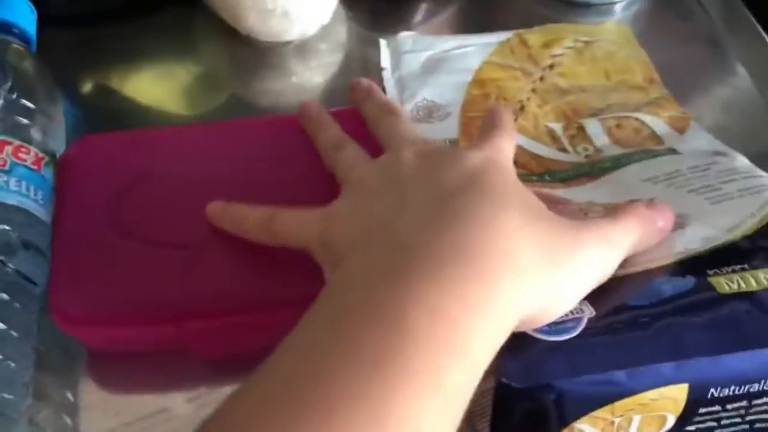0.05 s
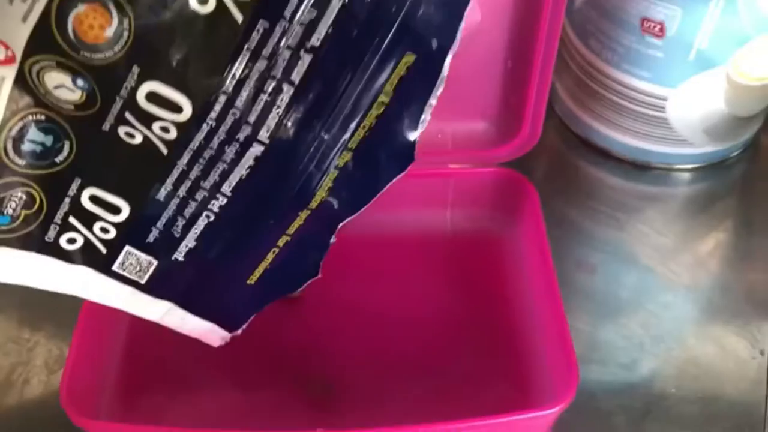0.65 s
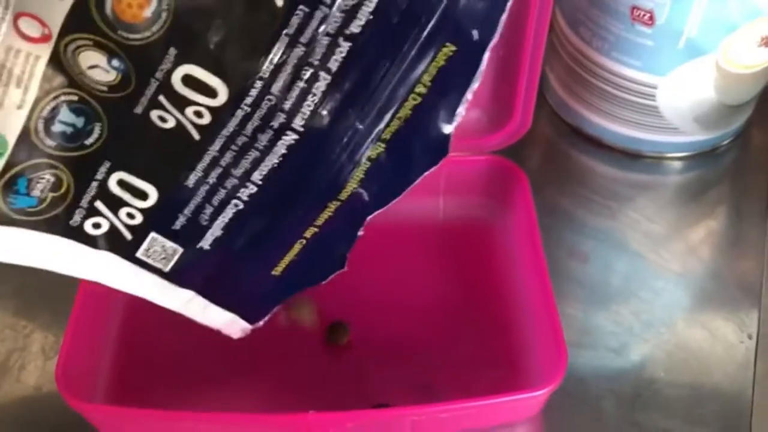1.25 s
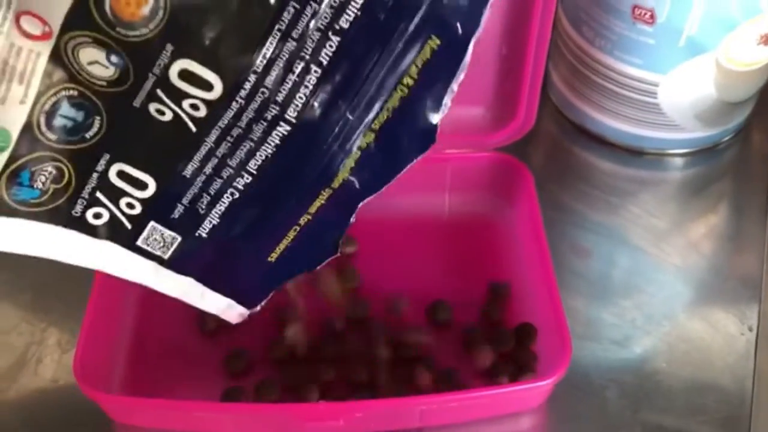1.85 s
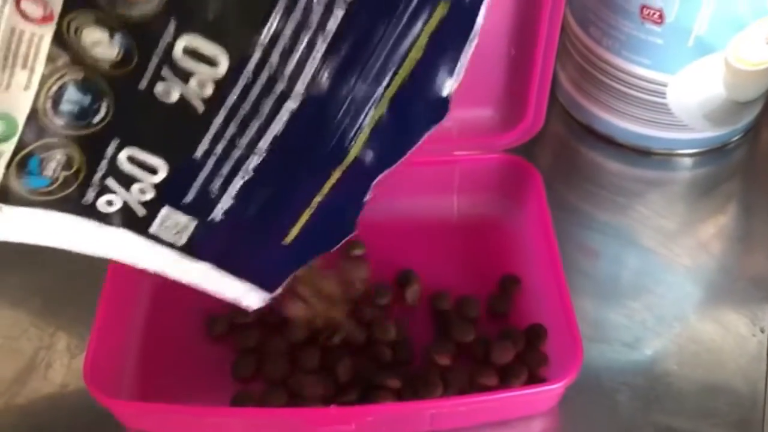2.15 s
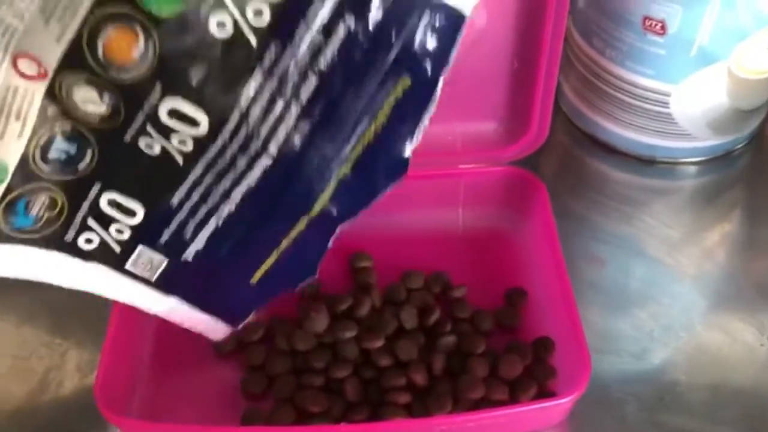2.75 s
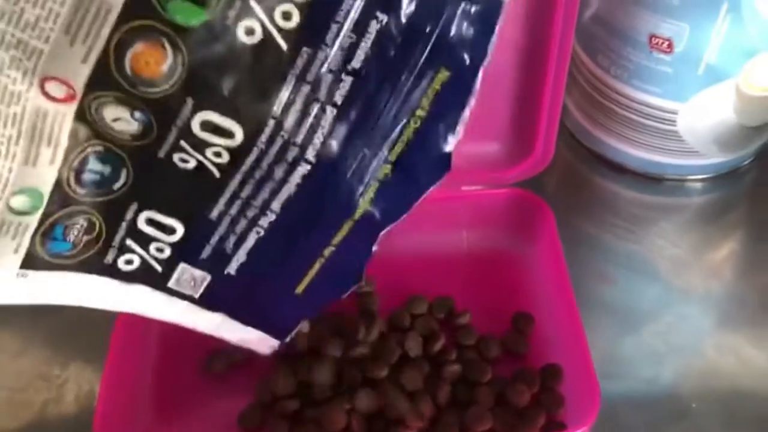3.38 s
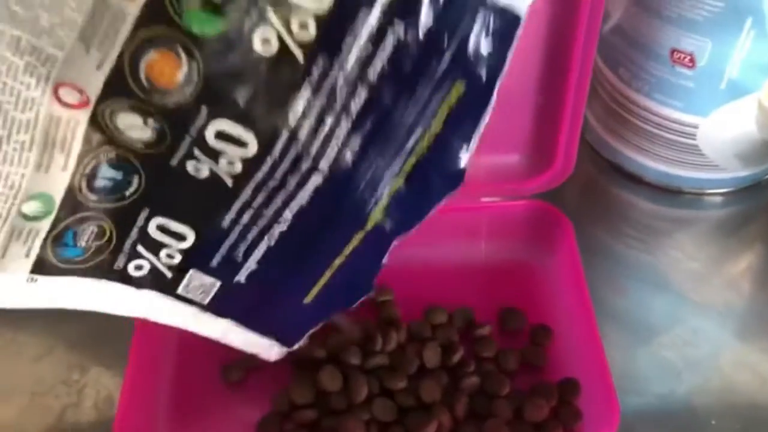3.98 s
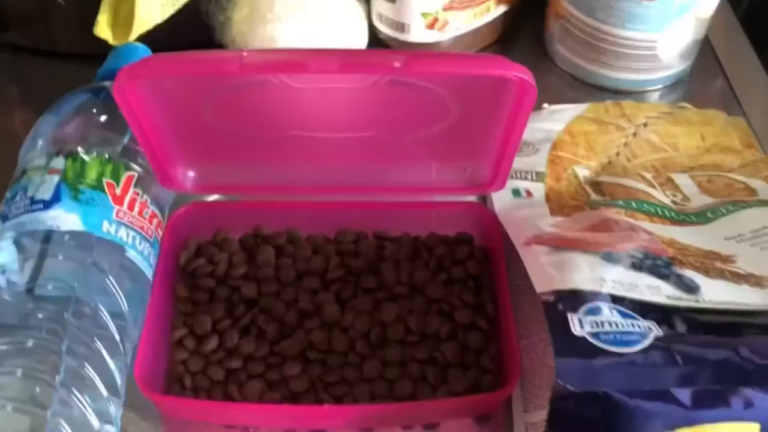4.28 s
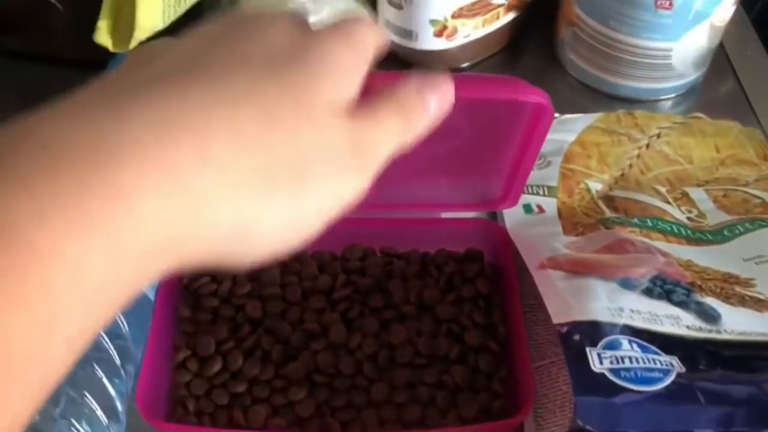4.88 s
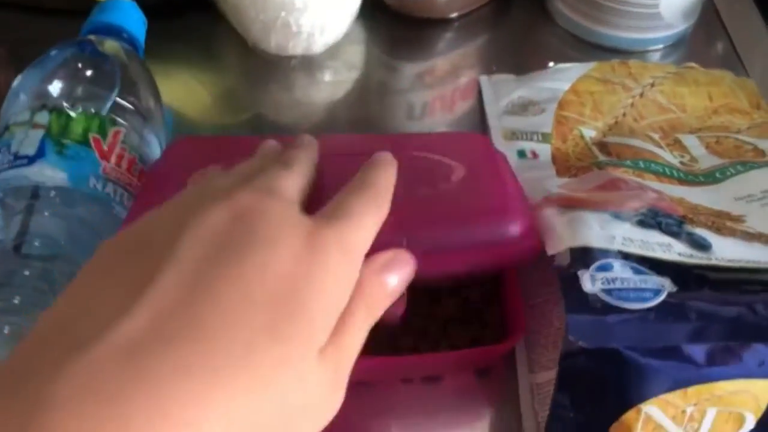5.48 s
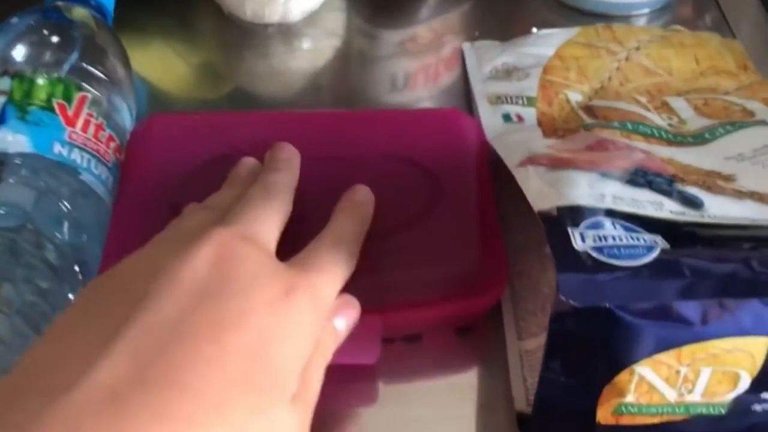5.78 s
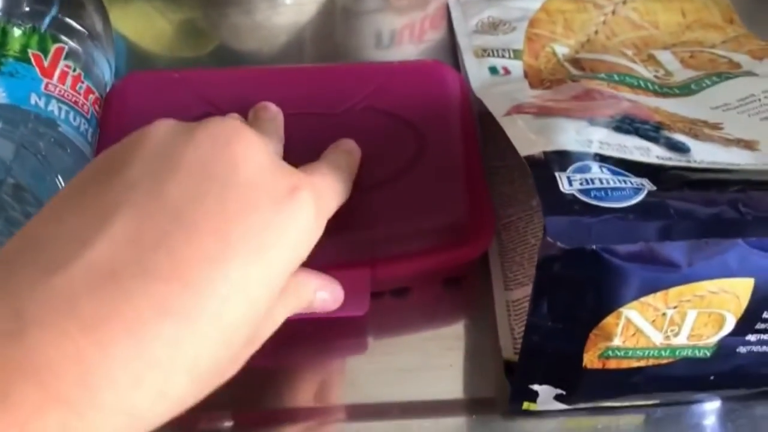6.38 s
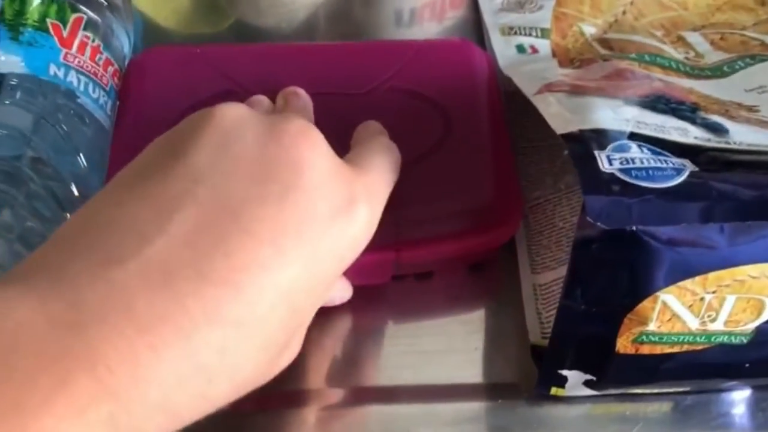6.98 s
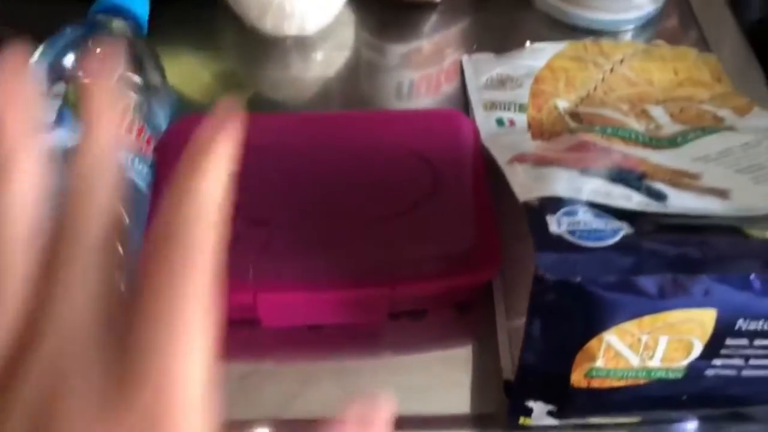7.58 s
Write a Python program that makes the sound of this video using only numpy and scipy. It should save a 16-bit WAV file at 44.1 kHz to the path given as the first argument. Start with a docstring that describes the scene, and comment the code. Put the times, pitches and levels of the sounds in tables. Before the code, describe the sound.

Dry pet food pours from a crinkling foil bag into a plastic box, then the lid is pressed down and snaps shut.

```python
"""A small kitchen, close up. A plastic box sticks, slips and knocks over a steel counter.
Dry kibble tumbles in a crinkling foil bag and pours into the box, each pellet a crack that rings
the thin floor. The last pieces are shaken out; the lid is folded down and snaps shut.
Soft hiss and an appliance drone lie underneath. The sound drops out briefly twice."""
import sys
import numpy as np
from scipy import signal
from scipy.fft import rfft, irfft
from scipy.io import wavfile
from scipy.ndimage import uniform_filter1d

SR = 44100
rng = np.random.default_rng(int(sys.argv[2]) if len(sys.argv) > 2 else 0)


def waveform_to_disk(signal):
    """Save audio, clipped to [-1, 1], as 16-bit WAV at the path in sys.argv[1]."""
    frames = np.transpose(np.atleast_2d(signal))
    scaled = np.clip(frames, -1, 1) * 32767
    samples = np.round(scaled).astype(np.int16)
    wavfile.write(sys.argv[1], SR, samples)


N = 341334
TIME_S = np.arange(N) / SR
GRAIN_S = np.arange(4096) / SR
HZ = np.fft.rfftfreq(len(GRAIN_S), 1 / SR)

# plastic box modes: pitch_hz, level_db, t60_s
BOX_MODES = [(315, -12, 0.049), (370, -12, 0.02), (470, -5.5, 0.06), (634, -5, 0.013), (720, -3.5, .045),
             (850, -1, 0.019), (992, 3, 0.052), (980, -5, .03), (1165, -3, .035), (1356, -7.5, .05),
             (1500, -5.5, .03), (1770, -4, 0.11), (2310, -10.5, .03)]
# steel counter modes: pitch_hz, level_db, t60_s
COUNTER_MODES = [(72, -11, 0.075), (107, -6, 0.059), (134, -3.5, 0.17), (161, -0.5, 0.1),
                 (191.8, -2.5, 0.097), (232, -7, 0.062), (286, -5.5, 0.035), (370, -0.5, 0.078)]
# friction hiss: freq_hz, level_db
FRICTION_SPECTRUM = [(900, -17), (1800, -7), (3000, -4), (4300, -6), (6000, -7), (8500, -12.5),
                     (11500, -17), (13000, -50)]


def gain_of(db):
    """Decibels to amplitude."""
    return 10 ** (np.asarray(db) / 20)


def unit(x):
    """Scales to energy 1."""
    return x / (np.linalg.norm(x) + 1e-12)


def curve_at(points, hz):
    """Interpolates on a log-frequency axis."""
    freq_hz, value = np.transpose(points)
    return np.interp(np.log(hz + 1), np.log(freq_hz + 1), value)


def fade(t, t60_s):
    """Exponential decay."""
    return np.exp(-np.log(1000) * t / np.maximum(t60_s, 1e-4))


def swell(start_s, length_s, level_db, rise_s, fall_s):
    """Rises to start_s, holds, falls; about 60 dB per rise_s and fall_s."""
    spans_away = np.maximum((start_s - TIME_S) / rise_s, (TIME_S - start_s - length_s) / fall_s)
    return gain_of(level_db) * fade(np.clip(spans_away, 0, 2), 0.98)


def add(mix, start_s, sound):
    """Mixes a sound in at start_s."""
    part = mix[max(round(start_s * SR), 0):][:len(sound)]
    part += sound[:len(part)]


def click(spectrum_db):
    """Minimum-phase pulse with this spectrum."""
    log_gain = np.log(gain_of(np.maximum(spectrum_db - spectrum_db.max(), -100)))
    mirrored = np.r_[log_gain, log_gain[-2:0:-1]]
    log_response = np.conj(signal.hilbert(mirrored))[:len(HZ)]
    return unit(irfft(np.exp(log_response)))


def coloured(x, spectrum_db):
    """Causal filter with this spectrum."""
    return signal.oaconvolve(x, click(spectrum_db))[:len(x)]


def wash(spectrum):
    """Smooth coloured noise, rms 1."""
    noise = coloured(rng.standard_normal(N), curve_at(spectrum, HZ))
    return noise / np.sqrt(np.mean(noise ** 2) + 1e-20)


def crack(spectrum_db, t60_s):
    """Hard contact: countless tiny, short-lived modes, as a noise burst."""
    burst = rng.choice([-1., 1.], len(GRAIN_S)) * fade(GRAIN_S, t60_s)
    return unit(coloured(burst, spectrum_db))


def ring(modes, spread_db, detune):
    """Modes struck at a random spot, which weights and detunes them."""
    pitch_hz, level_db, t60_s = np.transpose(modes)[:, :, None]
    weight, shift, sign = rng.uniform(-1, 1, (3, len(pitch_hz), 1))
    cycles = pitch_hz * (1 + detune * shift) * GRAIN_S
    waves = np.sin(2 * np.pi * cycles) * fade(GRAIN_S, t60_s) * (1 - np.exp(-2 * cycles))
    return unit((np.sign(sign) * gain_of(level_db + spread_db * weight) * waves).sum(0))


def patter(grains, per_s, spread_db):
    """Random shower of grains, many small and a few large, at a steady mean level."""
    chance = rng.random(N)
    sizes = gain_of(spread_db * np.minimum(rng.exponential(1, N), 3))
    kind = rng.integers(0, len(grains), N)
    shower = np.zeros(N)
    for i in np.flatnonzero(chance < per_s / SR):
        add(shower, i / SR, sizes[i] * grains[kind[i]])
    local_power = abs(uniform_filter1d(shower ** 2, size=3000))
    return shower / np.sqrt(local_power + 0.011 * np.mean(shower ** 2))


def pour(flow):
    """Pellets of many sizes rain on the box and each other, denser as the flow grows."""
    # pellet impact: freq_hz, level_db
    spectrum = [(820, -42.5), (1400, -10), (2300, -4.5), (2650, 7), (4270, 4), (9160, -12.5),
                (11200, -10.5), (12000, -33.5), (15600, -62), (22000, -120)]
    sizes = np.exp(0.16 * rng.standard_normal(90))
    grains = [pellet(curve_at(spectrum, HZ * size), t60_s=.011) for size in sizes]
    return flow * patter(grains, per_s=160 + 520 * flow / flow.max(), spread_db=3.5)


def pellet(spectrum_db, t60_s):
    """One pellet lands: a dry crack and a faint ring of the box floor."""
    # thin box floor: pitch_hz, level_db, t60_s
    floor_modes = [(2000, -11, 0.12), (2080, 5.5, 0.058), (2630, 12.5, 0.049), (2780, 1, 0.18),
                   (2950, -4.5, .06), (3070, -9.5, 0.036), (3500, 2, 0.04), (3700, -1.5, 0.039),
                   (3960, -6.5, 0.029), (4280, -3, 0.019), (5150, -4, 0.0093), (6150, -6.5, 0.011)]
    strike = unit(0.24 * click(spectrum_db) + crack(spectrum_db, t60_s))
    return strike + gain_of(-9) * ring(floor_modes, spread_db=7.5, detune=0.01)


def outflow(motion):
    """Envelope of the stream from the bag: a trickle while the kibble slides, plus gushes."""
    # gushes at the bag mouth: start_s, length_s, level_db
    gushes = [(1.435, 0.13, -28.5), (1.746, 0.036, -30), (1.848, .09, -27), (2.03, .05, -29.5),
              (2.295, 0.051, -33), (2.407, 0.013, -39.5), (3.349, 0.025, -42)]
    surges = [swell(*gush, rise_s=0.68, fall_s=0.64) for gush in gushes]
    trickle = gain_of(-16) * motion
    return np.linalg.norm([trickle] + surges, axis=0)


def ticks():
    """Single pellet strikes and snapping creases, each with a hollow thud of the box."""
    # strikes: start_s, level_db, brightness_hz, thud_db
    strikes = [(.6588, -3.5, 2870, -32), (.7341, -17.5, 3270, -29.5), (0.8618, -29.5, 2400, -49.5),
               (.9411, -4, 2800, -24), (1.0021, -5.5, 4000, -30), (1.0565, -20, 3700, -40),
               (1.0714, -30, 1700, -24.5), (1.2733, -2, 2970, -37.5), (1.3249, -13.5, 4180, -38.5),
               (1.3423, -12, 2750, -39), (1.3565, -7, 4470, -42.5), (1.3868, -1, 4700, -25),
               (1.4018, -3, 3260, -39.5), (1.4445, -5, 3710, -34.5), (1.4619, -8.5, 4170, -30),
               (1.481, -10.5, 4120, -26.5), (1.496, 1.5, 2860, -20), (1.54, -6.5, 4430, -28),
               (1.5494, -8.5, 2720, -40), (1.558, -6, 2640, -39), (1.5999, 1, 4540, -23),
               (1.745, -11, 4400, -22.5), (1.8195, -4.5, 3720, -38.5), (1.8777, -7, 2750, -33.5),
               (1.9858, -4, 4400, -38.5), (2.0069, -6.5, 2720, -24.5), (2.051, -7.5, 3100, -25.5),
               (2.0643, -1.5, 4800, -20), (2.0703, -5.5, 2914, -32.5), (2.1234, -14.5, 2700, -23.5),
               (2.235, -15, 4100, -42), (2.249, -10, 2720, -46), (2.2677, -7.5, 3860, -24),
               (2.3121, -12.5, 2750, -18), (2.3531, -10.5, 2710, -28), (2.4298, -12, 3540, -23),
               (2.4435, -12.5, 2180, -21), (2.5115, -24, 2780, -41), (2.578, -49, 1700, -29),
               (2.6619, -20.5, 2500, -24), (2.743, -38, 1710, -30), (2.7813, -30, 2070, -26),
               (2.9839, -31, 2870, -47), (3.0642, -28.5, 1830, -31), (3.0902, -17, 3170, -25.5),
               (3.1515, -23, 3300, -35), (3.1594, -27, 1560, -27), (3.242, -20, 3500, -32),
               (3.2803, -22, 2740, -24), (3.3727, -17.5, 2910, -39), (3.5322, -18, 1720, -24),
               (3.6438, -18, 1710, -28.5), (3.6549, -21, 2800, -23), (3.679, -26, 1720, -29),
               (3.713, -8.5, 2600, -22.5), (3.749, -20.5, 3520, -30.5), (3.7776, -25, 3420, -41),
               (3.8298, -18, 3000, -25), (3.8644, -25.5, 2800, -37), (3.9416, -32.5, 1600, -34),
               (3.9675, -18, 3700, -38), (4.0209, -26, 1710, -31), (4.0674, -23.5, 2500, -30),
               (4.1016, -37, 1610, -33.5), (4.231, -23, 2130, -35)]
    # hard strike: freq_hz, level_db
    spectrum = [(530, -29.5), (900, -16.5), (1560, -12), (2720, 0.5), (3680, -2), (4240, 0), (5040, -4.5),
                (6470, -6.5), (7450, -10), (7950, -12.5), (8480, -13.5), (11400, -21), (12000, -39),
                (15600, -59), (22000, -120)]
    out = np.zeros(N)
    for start_s, level_db, brightness_hz, thud_db in strikes:
        tilt_db = 3 * np.log2(brightness_hz / 3000) * np.log2((HZ + 200) / 3000)
        t60_s = 0.014 * 2 ** (-level_db / 32)  # harder is shorter
        thud = unit(ring(BOX_MODES, spread_db=9, detune=0.035) * fade(GRAIN_S, 0.042))
        tick = pellet(curve_at(spectrum, HZ) + tilt_db, t60_s)
        add(out, start_s, gain_of(level_db + 10.5) * tick + gain_of(thud_db + 17) * thud)
    return out


def sliding():
    """Envelope of the kibble sliding and settling as the bag is tipped or jogged."""
    # tips of the bag: start_s, length_s, level_db, rise_s, fall_s
    tips = [(0.676, .14, -54, -2.5, 1.27), (1.121, 1.142, -34.5, 1, 1.8), (2.742, 0.16, -50, 0.26, 1.4),
            (3.29, 0.097, -37.5, 0.38, 0.83), (3.742, 0.22, -50.5, .5, 1.2)]
    return sum(swell(*tip) for tip in tips)  # negative rise_s: on from time zero


def tumble(motion):
    """Pellets roll against the soft bag wall: dull pats and a fine scrape on the foil."""
    # pat inside the bag: freq_hz, level_db
    spectrum = [(30, -43), (60, -18), (125, -7), (200, -4), (330, -5), (480, -2.5), (700, -2), (1000, 3),
                (1750, 0), (2800, -13.5), (3700, -39.5), (6000, -83)]
    grains = []
    for octave in rng.uniform(-1.7, 1.63, 60):
        resonance_db = 8 * np.exp(-(np.log2((HZ + 1) / 800) - octave) ** 2 / 0.11)
        pat = crack(curve_at(spectrum, HZ) + resonance_db, t60_s=0.02)
        grains.append(pat + gain_of(-15.5) * ring(BOX_MODES, spread_db=3, detune=0.055))
    speed = motion / motion.max()
    pats = patter(grains, per_s=110 + 450 * speed, spread_db=4.5)
    scrape = gain_of(-13) * speed ** .5 * wash(FRICTION_SPECTRUM)
    return motion * (pats + scrape)


def crumples():
    """Tiny creases of the shaken foil bag give way in a dense crunch."""
    # shakes: start_s, length_s, level_db
    shakes = [(1.33, 0.22, -35.5), (1.498, 0.15, -30.5), (1.813, 0.16, -31.5), (2.415, .079, -38.5),
              (2.811, 0.026, -38.5), (2.835, 0.059, -36.5), (3.247, 0.15, -36.5), (3.448, .07, -39)]
    # foil crease: freq_hz, level_db
    spectrum = [(180, -43), (300, -8), (818, -10), (1020, 1.5), (1360, -8), (1720, -4.5), (4070, -5.5),
                (10900, -24), (12000, -42), (15600, -65.5), (22000, -120)]
    grains = [crack(curve_at(spectrum, HZ), t60_s=0.0033) for _ in range(30)]
    squeeze = np.zeros(N)
    for start_s, length_s, level_db in shakes:
        add(squeeze, start_s, gain_of(level_db) * signal.windows.tukey(round(length_s * SR), .4))
    return squeeze * patter(grains, per_s=1500, spread_db=5.5)


def latch():
    """The catch jumps its lip: one pulse shakes lid, box and counter and rattles the kibble."""
    # snap: freq_hz, level_db
    snap_spectrum = [(60, -22), (170, -17), (300, -15.5), (480, -10), (700, 1), (950, -1.5), (1320, 3.5),
                     (1620, -7.5), (1950, -1), (2500, -11.5), (3600, -21), (4500, -18.5), (6000, -19),
                     (11200, -25), (12400, -59)]
    # lid latched taut: pitch_hz, level_db, t60_s
    lid_modes = [(609, -5.5, 0.129), (705, -2, .17), (1380, -3.5, .14), (2050, -5, .15), (2340, -8.5, .12),
                 (4600, -13.5, .1)]
    # jolted kibble: freq_hz, level_db
    rattle_spectrum = [(600, -20.5), (1350, -7), (2000, 1.5), (2700, -10), (5000, -21.5), (11000, -27)]
    start_s, level_db = 6.7278, 12.35
    snap = click(curve_at(snap_spectrum, HZ))
    walls = gain_of(-15) * ring(BOX_MODES, spread_db=4, detune=0.0092)
    lid = gain_of(-11.5) * ring(lid_modes, spread_db=.5, detune=.004)
    boom = gain_of(-16.5) * ring(COUNTER_MODES, spread_db=3.5, detune=.02)
    rattle = crack(curve_at(rattle_spectrum, HZ), t60_s=0.12)
    out = np.zeros(N)
    add(out, start_s, gain_of(level_db) * (snap + walls + lid + boom))
    add(out, start_s + .003, gain_of(level_db - 15) * rattle)
    return out


def knocks():
    """A blow flexes one panel; its edge clicks, the hand-damped walls ring, the counter booms."""
    # blows on box and lid: start_s, level_db, pitch_hz, edge_db, boom_db, panel_db
    blows = [(.002, -21, 390, -55, -50, -9), (.037, -32, 424, -66, -37, 8), (0.2821, -20, 840, -32, -70, 9),
             (0.39, -22, 990, -58, -64, -10), (.4749, -13, 680, -27.5, -52, -5),
             (0.5004, -16, 1030, -32.5, -60, -5), (0.525, -27, 1030, -51, -56.5, -5),
             (4.9817, -27, 840, -43, -54, -14), (5.141, -31, 790, -56, -58, -10),
             (5.307, -32.5, 789, -57, -60, -12), (5.424, -25.5, 900, -54, -48, -20),
             (5.5446, -26.5, 710, -38.5, -36, -11), (5.618, -3.5, 1170, -42, -44, -5),
             (5.632, -30, 1250, -43, -38, -1), (7.2412, -36.5, 383, -69.5, -63, -4),
             (7.297, -42, 715, -55, -68, -15), (7.36, -31.5, 438, -58, -58, 3),
             (7.416, -29, 474, -62, -47, 4)]
    # panel flex: freq_hz, level_db
    flex_spectrum = [(60, -20), (150, -13), (400, -7), (650, -0.5), (1150, 2), (1500, -6), (2100, -13.5),
                     (3000, -17.5), (6000, -53), (12000, -88)]
    # edge click: freq_hz, level_db
    edge_spectrum = [(500, -30), (1400, 6), (2700, 4.5), (4000, 6.5), (7000, -6.5), (12000, -21.5)]
    edge_curve_db = curve_at(edge_spectrum, HZ)
    out = np.zeros(N)
    for start_s, level_db, pitch_hz, edge_db, boom_db, panel_db in blows:
        flex = click(curve_at(flex_spectrum, HZ * (1080 / pitch_hz) ** 0.75))
        cycles = pitch_hz * GRAIN_S
        envelope = fade(GRAIN_S, t60_s=22 / pitch_hz) * (1 - np.exp(-2 * cycles))
        panel = unit(np.sin(2 * np.pi * cycles) * envelope)
        walls = ring(BOX_MODES, spread_db=2, detune=0.033) * fade(GRAIN_S, 0.1)
        edge = unit(crack(edge_curve_db, t60_s=0.029) + .5 * click(edge_curve_db))
        boom = ring(COUNTER_MODES, spread_db=-3, detune=0.054)
        add(out, start_s, gain_of(level_db + 9.5) * (flex + gain_of(panel_db) * panel + walls))
        add(out, start_s, gain_of(edge_db + 27) * edge + gain_of(boom_db + 29.5) * boom)
    return out


def rubs():
    """Plastic sticks and slips on steel, its own rim and fingers: coarse judder under fine hiss."""
    # strokes: start_s, length_s, judder_db, hiss_db
    strokes = [(0, .03, -38, -56), (0.149, 0.033, -40.5, -50.5), (0.245, 0.22, -52, -51),
               (0.509, 0.017, -39.5, -42.5), (5.517, 0.097, -44, -67), (5.545, .008, -34.5, -35.5),
               (7.3, .11, -65, -65), (7.37, .012, -44.5, -69)]
    # stick-slip judder: freq_hz, level_db
    judder_spectrum = [(35, -37), (60, -4), (163, 0), (237, -0.5), (414, 4), (538, -2), (634, 1), (823, -2),
                       (986, 3), (1090, -1), (2160, -10), (2420, -17), (3000, -19), (3900, -49),
                       (6600, -120)]
    coarse_slips = [crack(curve_at(judder_spectrum, HZ), t60_s=0.026) for _ in range(40)]
    judder = patter(coarse_slips, per_s=380, spread_db=6)
    fine_slips = [crack(curve_at(FRICTION_SPECTRUM, HZ), t60_s=0.011) for _ in range(20)]
    hiss = patter(fine_slips, per_s=2800, spread_db=6.5)
    out = np.zeros(N)
    for start_s, length_s, judder_db, hiss_db in strokes:
        envelope = swell(start_s, length_s, level_db=-2.96, rise_s=0.12, fall_s=0.16)
        out += envelope * (gain_of(judder_db) * judder + gain_of(hiss_db) * hiss)
    return out


def bulge(flow):
    """The soft bag pushes air as it empties and puffs once when jogged."""
    # pushed air: freq_hz, level_db
    spectrum = [(25, -11.5), (45, -9.5), (65, -4.5), (95, -2.5), (180, -4), (400, -24.5), (1000, -59)]
    push = gain_of(-55.5) * (flow / flow.max()) ** .25
    puff = swell(start_s=3.295, length_s=0, level_db=-40.5, rise_s=.07, fall_s=0.32)
    return (push + puff) * wash(spectrum)


def bend(x, delay_at_1khz_s):
    """Bending waves in thin walls: treble arrives first, bass last."""
    hz = np.fft.rfftfreq(2 * N, 1 / SR)
    lag_rad = 4 * np.pi * delay_at_1khz_s * np.sqrt(1000 * hz)
    return irfft(rfft(x, 2 * N) * np.exp(-1j * lag_rad))[:N]


def room(x, tail_db, echo_db):
    """Echoes off the counter and nearby jars, then the kitchen's short tail."""
    # tail decay: freq_hz, t60_s
    decay_times = [(120, 0.5), (500, 0.21), (1600, .34), (5000, 0.4), (11000, 0.19)]
    # tail colour: freq_hz, level_db
    spectrum = [(100, 5.5), (500, 9), (1200, -2.5), (2800, 1), (6000, -3.5), (11000, 3)]
    # near reflections: delay_s, level_db
    echoes = [(.0031, -11), (.0052, -14.5), (.0078, -23.5), (.0096, -8.5), (0.0151, -25.5), (0.0165, -30.5)]
    hz, t, bands = signal.stft(rng.standard_normal(SR * 2 // 3), SR, nperseg=256)
    decay = fade(t, curve_at(decay_times, hz)[:, None])
    colour = gain_of(curve_at(spectrum, hz))[:, None]
    tail = signal.istft(bands * decay * colour, SR)[1]
    onset = 1 - np.exp(-np.arange(len(tail)) / SR / 0.0068)
    response = gain_of(tail_db) * unit(tail * onset)
    for delay_s, level_db in echoes:
        add(response, delay_s, gain_of([level_db + echo_db]))
    return x + signal.oaconvolve(x, response)[:N]


def background():
    """Soft kitchen hiss over a low appliance drone that swells once."""
    # hiss contour: time_s, level_db
    air_levels = [(.6, -53.5), (4.2, -59.5), (4.5, -56.5), (7.7, -66.5)]
    # hiss: freq_hz, level_db
    air_spectrum = [(25, -23), (90, -9), (250, -1), (400, -7.5), (700, -5.5), (1200, -1.5), (1700, -5.5),
                    (2600, -10), (3700, -17.5), (5500, -22), (8000, -27), (12000, -37)]
    # drone: freq_hz, level_db
    hum_spectrum = [(25, -29), (48, -21), (57, -5.5), (63.5, -3), (71, -9.5), (85, -20.5), (105, -18),
                    (130, -25), (400, -54.5)]
    air_gain = gain_of(np.interp(TIME_S, *np.transpose(air_levels)))
    hum_gain = gain_of(-68) + swell(start_s=4.9, length_s=0.77, level_db=-67.5, rise_s=1.8, fall_s=4.5)
    return air_gain * wash(air_spectrum) + hum_gain * wash(hum_spectrum)


def scene():
    """Kibble, bag and box in the kitchen, mono."""
    motion = sliding()
    flow = outflow(motion)
    contacts = ticks() + pour(flow) + tumble(motion) + crumples() + knocks() + latch() + rubs()
    near = bend(contacts, delay_at_1khz_s=.0011)
    return (room(near, tail_db=-10, echo_db=-8.5) + bulge(flow) + background())[None]


def record(dry):
    """Microphone bass roll-off, two dropouts, clipping and a band limit."""
    # silences: start_s, end_s
    dropouts = [(.572, .63), (4.262, 4.322)]
    low_hz, high_hz = 50, 12050
    thinned = signal.sosfilt(signal.butter(2, low_hz, "highpass", fs=SR, output="sos"), dry)
    gate = np.ones(N)
    for start_s, end_s in dropouts:
        gate[(TIME_S > start_s) & (TIME_S < end_s)] = 0
    clipped = np.clip(thinned * uniform_filter1d(gate, size=400), -.84, .84)
    lowpass = signal.firwin(201, high_hz, window=("kaiser", 8), fs=SR)
    return signal.oaconvolve(clipped, lowpass[None], "same")


dry = scene()
out = record(dry)
waveform_to_disk(out)
```